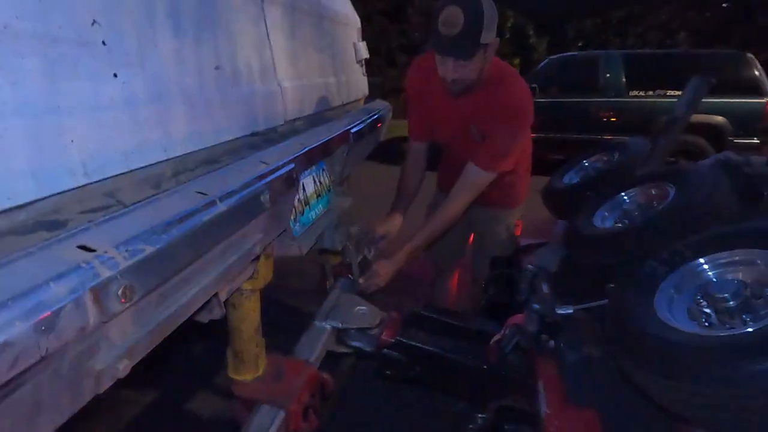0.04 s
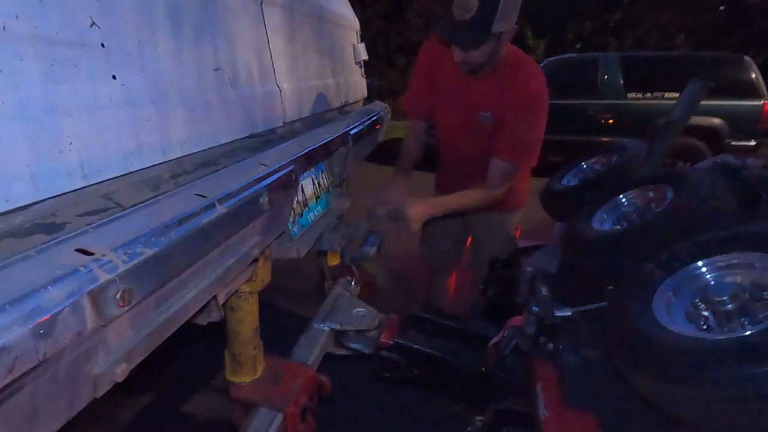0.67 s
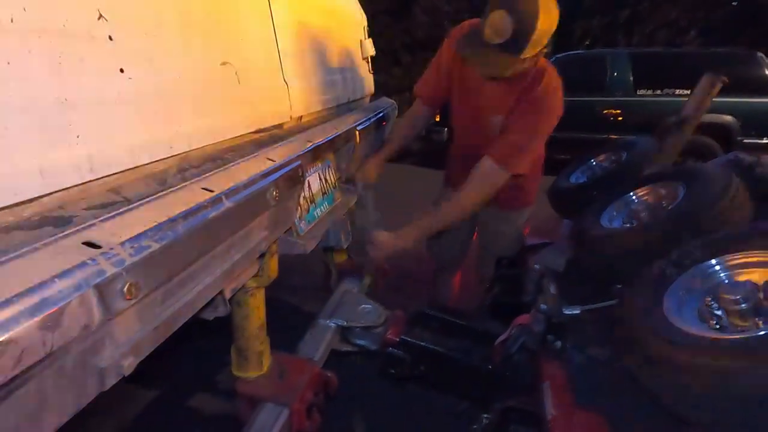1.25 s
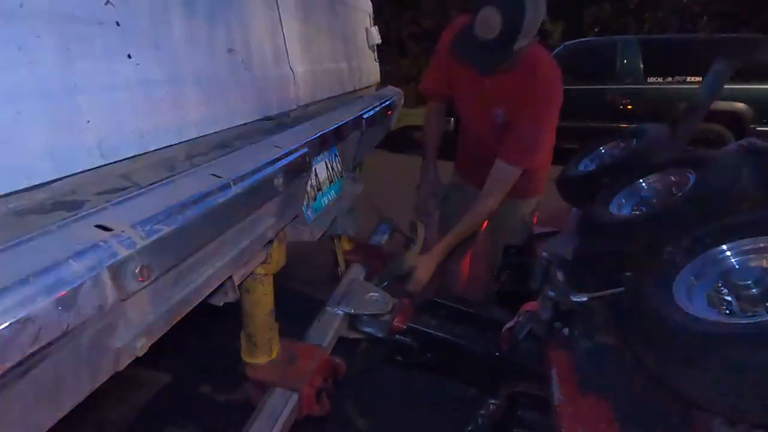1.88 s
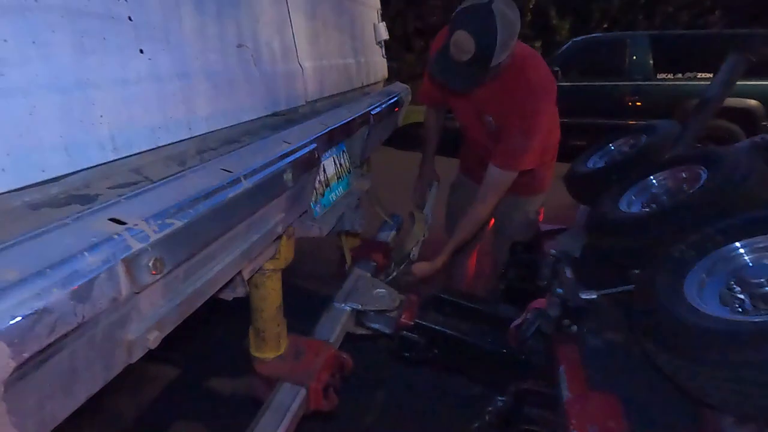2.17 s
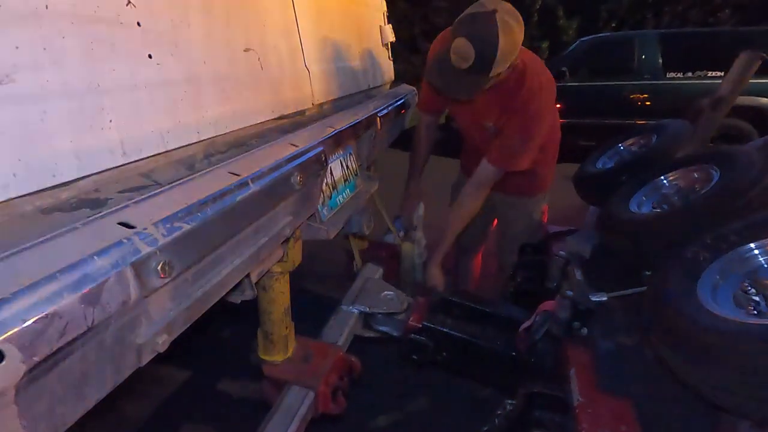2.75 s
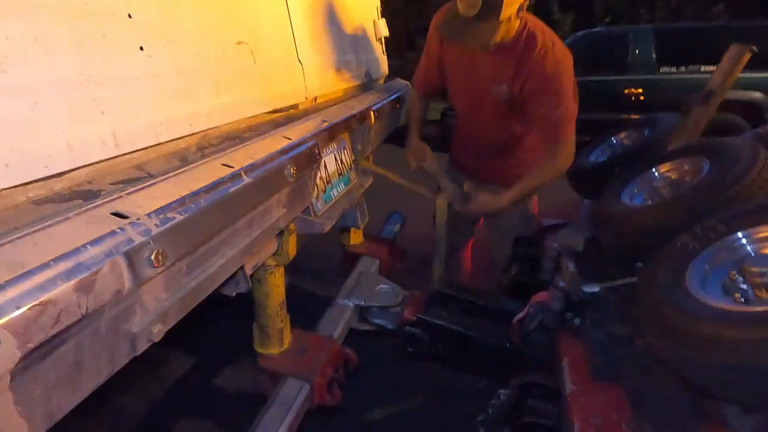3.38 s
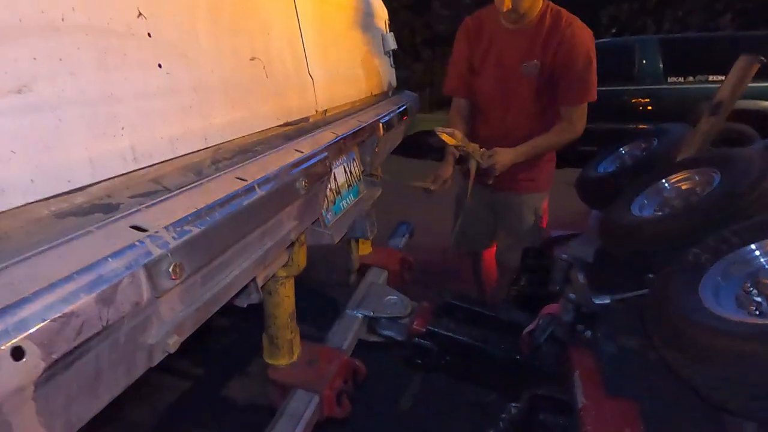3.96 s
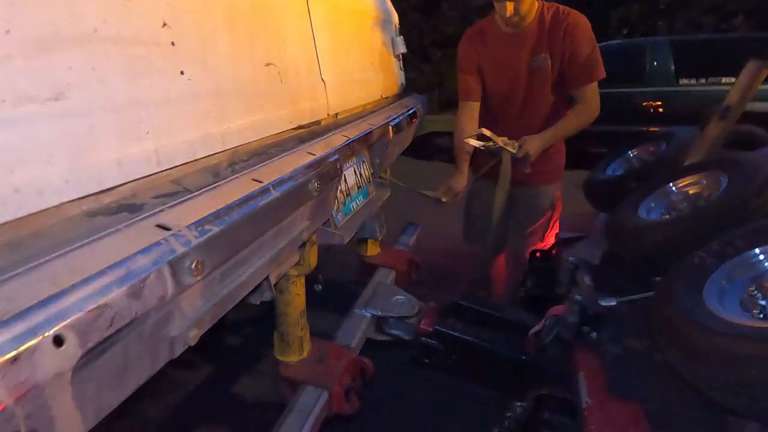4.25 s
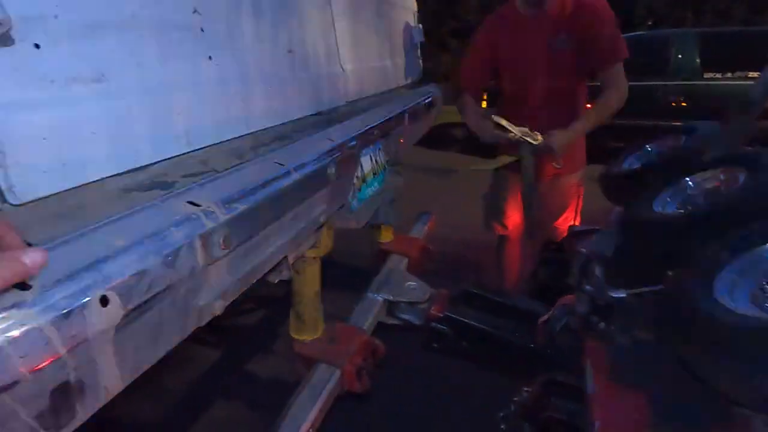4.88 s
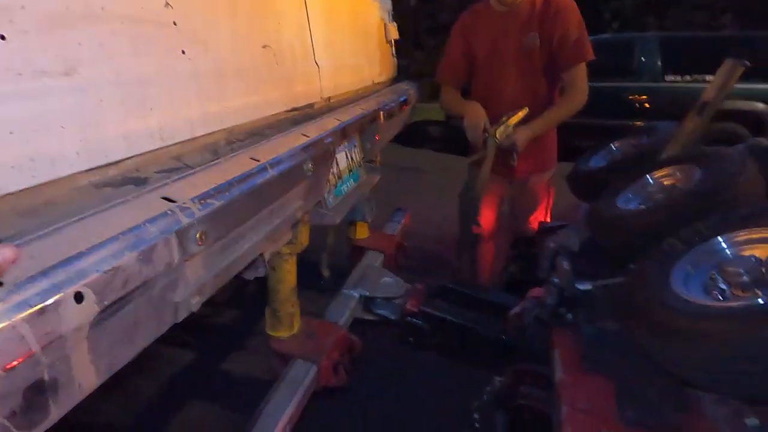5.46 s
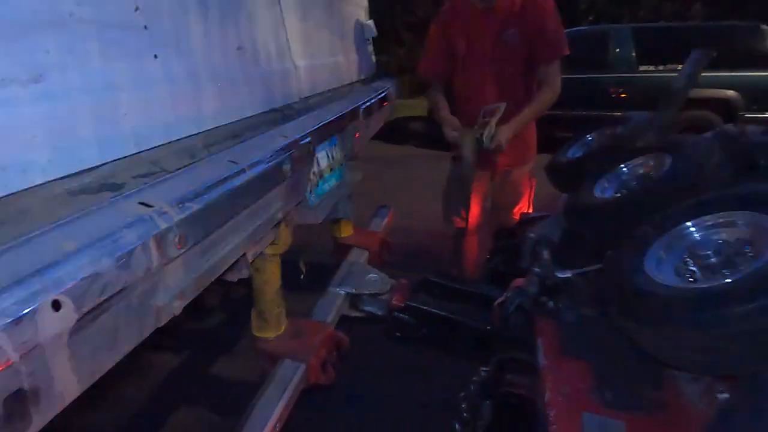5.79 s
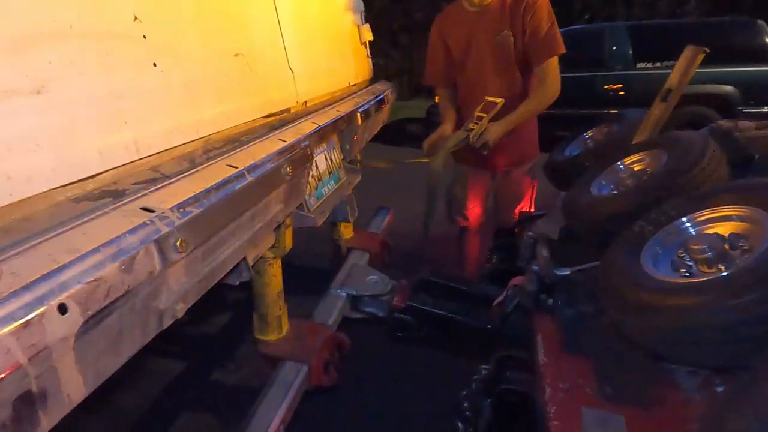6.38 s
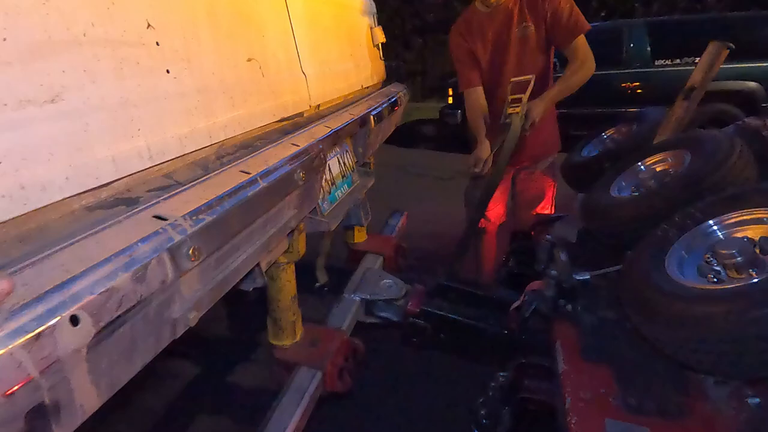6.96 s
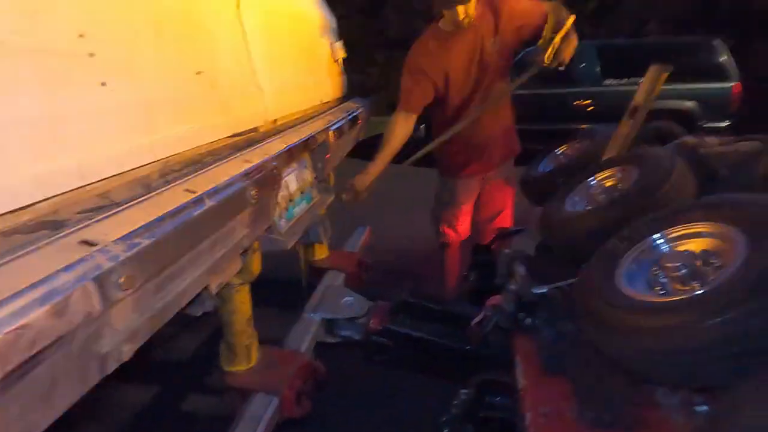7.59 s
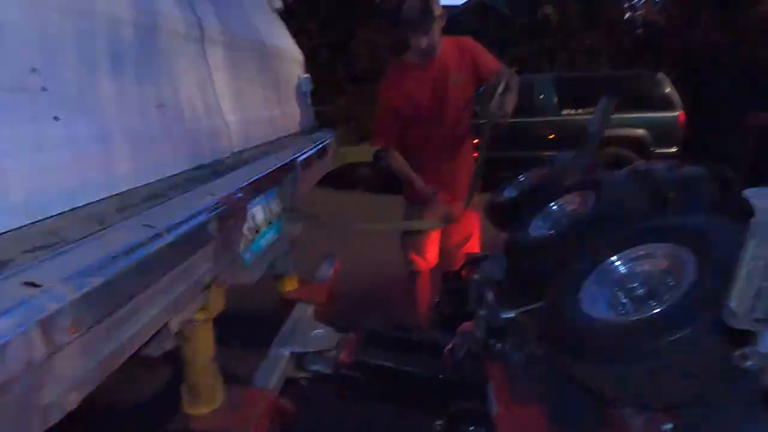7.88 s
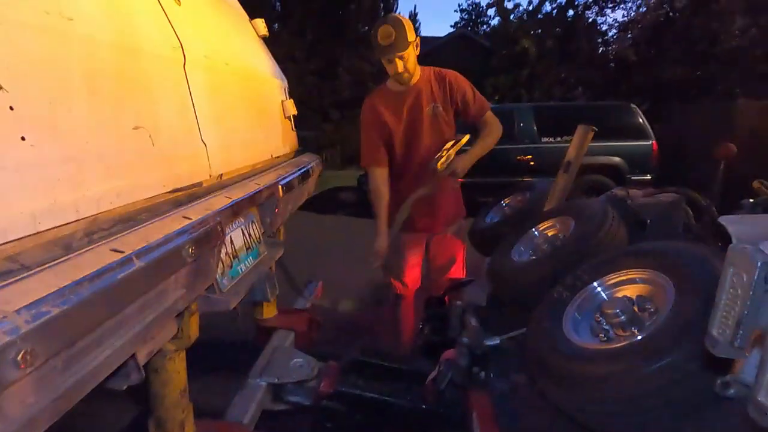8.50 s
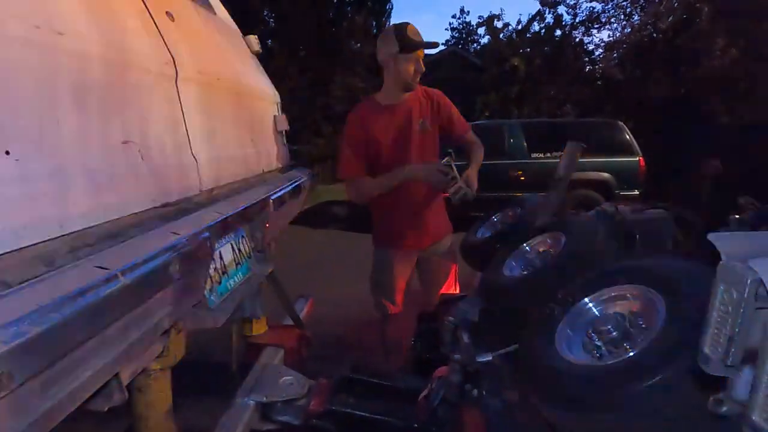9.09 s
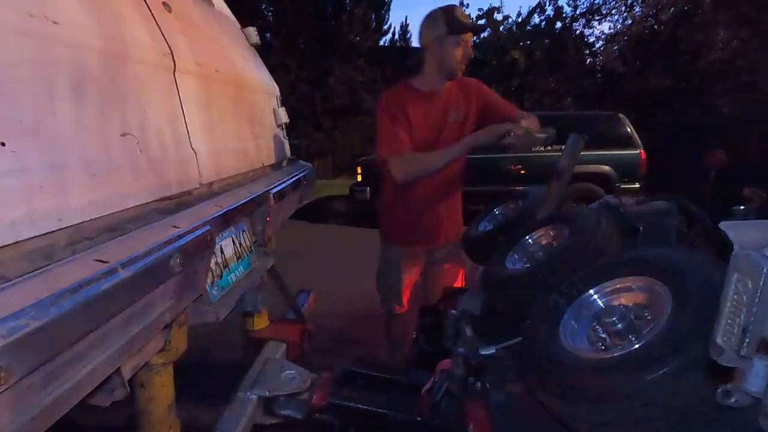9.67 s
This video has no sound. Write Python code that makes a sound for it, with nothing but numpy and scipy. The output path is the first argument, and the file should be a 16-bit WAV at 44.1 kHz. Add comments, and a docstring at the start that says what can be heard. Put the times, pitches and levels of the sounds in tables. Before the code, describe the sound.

A steel hook knocks on a truck's rear frame, then lands one heavy, ringing clank with a short clatter. A strap ratchet clinks and rattles in irregular bursts, and the hook rings briefly as it swings free. Webbing slides softly, the hook drops with a light thud, and a sharp clink comes last. The microphone is a few steps away in a quiet yard with faint traffic and a breeze.

```python
"""A yard at dusk, one microphone a few steps from the rear of a truck; distant traffic, slowly moving air.
As a far engine pulls away, a man unhooks a ratchet strap: the hook knocks and clanks on the frame.
The steel ratchet clinks and rattles in his hands, and near four seconds the hook swings free, ringing.
More clinks follow, the webbing rubs and slides, and near eight seconds a gust reaches the microphone.
The hook drops with a thud; a few light contacts and one sharp clink come last."""
import sys
import numpy as np
from scipy import signal
from scipy.fft import rfft, irfft
from scipy.io import wavfile
from scipy.ndimage import uniform_filter1d

SR = 44100
rng = np.random.default_rng(int(sys.argv[2]) if len(sys.argv) > 2 else 0)


def transcribe(u):
    """Save the signal u as a 16-bit wav file named by the first command-line argument.

    u: samples, shape (n,) or (channels, n), limited to [-1, 1]; the rate is SR.
    q: integer samples, one column per channel.
    """
    v = np.clip(np.atleast_2d(u).T, -1, 1)
    q = np.round(v * 32767).astype(np.int16)
    wavfile.write(sys.argv[1], SR, q)


N = 429534

# Spectra of far traffic, air on the microphone, sliding webbing, a thud on the truck and struck steel.
# Each row: frequency in Hz, relative level in dB.
TRAFFIC_SPECTRUM = [(24, -36), (40, 1), (108, -1), (143, -7.5), (214, -8.5), (242, -12), (298, -12.5),
                    (478, -17.5), (521, -18), (600, -20), (702, -16.5), (1540, -19), (2180, -29.5),
                    (2380, -35), (2600, -31.5), (3380, -60), (5720, -120)]
AIR_SPECTRUM = [(1, -5.5), (4, -3.5), (8, -5), (14, -19), (22, -23.5), (34, -36), (50, -51.5), (120, -86),
                (1000, -140)]
WEBBING_SPECTRUM = [(1060, -26), (1800, 2.5), (2200, -7.5), (2940, 1), (4040, -3.5), (7100, -8),
                    (13400, -17.5), (15800, -25)]
THUD_SPECTRUM = [(40, -25.5), (110, -10), (330, -8.5), (520, 2.5), (760, -7.5), (1200, -4), (1700, -2.5),
                 (2500, -26.5), (6000, -62)]
STEEL_SPECTRUM = [(530, -37.5), (900, -11), (1560, -2.5), (2130, -7.5), (2580, -5), (3250, 1), (3620, -2),
                  (4330, -0.5), (6060, -2), (7510, -3), (8570, -7), (9900, -8.5), (12900, -13),
                  (15100, -16.5), (15800, -21.5)]
# The yard's reverberation. Each row: frequency in Hz, time to fall 60 dB (t60) in seconds.
YARD_DECAY = [(150, 0.76), (600, .5), (2000, 0.25), (6000, 0.15), (15000, 0.081)]
# Modes of the truck's rear frame, the free hook (its close pair beats), the ratchet's handle and its
# side plates. Each row: frequency in Hz, relative level in dB, t60 in seconds.
FRAME_MODES = [(88, -6, .6), (167, 2, .36), (205, -10, .5), (240, -3, .2), (318, 1, .35), (346, 0, .3),
               (382, -3, .5), (400, -3, .4), (437, -3, .35), (511, -5, .36), (537, -7, .4), (646, -18, .4),
               (993, -11, .22), (1105, -8, .26), (1236, -7, .24), (1371, -10, .25), (1470, -12, .3),
               (1557, -10, .25), (1852, -9, .22)]
HOOK_MODES = [(536, -10, .26), (877, -11, .1), (950, -9, .1), (1372, -7, .26), (1557, 2, .15),
              (1663, -1, .15), (2860, -12, .13), (3192, -10, .15), (3402, -3, .16), (3831, -12, .15),
              (5119, -7.5, .65), (5130, -7.5, .65), (5346, -22, .5), (5922, -6, .26), (11050, -36, .5),
              (14950, -21, .4)]
HANDLE_MODES = [(2400, -5, .17), (2740, -4, .11), (3270, -11, .1), (3520, -14, .14), (4690, 2, .16),
                (7510, -7, .11), (9312, -5, .24), (12940, -13, .08), (13215, -12, .1)]
PLATE_MODES = [(1323, 8.5, 0.045), (1675, 12.5, 0.044), (2745, 22.5, 0.03), (2920, 21, 0.028),
               (5230, 24, 0.029), (5730, 23, 0.029), (7430, 21.5, 0.037)]  # the grip scales these decay times
# The breeze swells. Each row: peak time in seconds, level in dB, half length in seconds.
GUSTS = [(0.05, -30, 0.23), (7.92, -20, 0.089)]
# A far engine pulls away. Each row: time in seconds, pitch in Hz, level in dB.
ENGINE_COURSE = [(0, 89.54, -52), (1.3, 96.7, -57), (2.102, 106.8, -57.5), (2.7, 115.9, -61.5),
                 (3.6, 118, -64.5)]
# Strap runs through the hands.
# Each row: peak time in seconds, relative level in dB, half length in seconds.
PULLS = [(0, -49.5, 0.081), (.55, -56.5, 0.18), (1.27, -66.5, .08), (1.65, -63.5, 0.5),
         (2.34, -70.5, 0.047), (2.72, -58, 0.13), (3.52, -57, 0.23), (4.25, -52.5, 0.26), (5.25, -61, .12),
         (5.98, -61.5, 0.25), (6.4, -62, 0.043), (6.83, -66, 0.064), (7.3, -54.5, 0.39), (8.52, -68, 0.16),
         (9.14, -63, 0.084), (9.7, -58, 0.2)]
# Strap and hook drag over metal and cloth, and near 4.5 s a hand brushes the truck; the brief low row near 8.6
# s is the dropped hook's thud. # Each row: peak time in seconds, level in dB, half length in seconds, centre
# frequency in Hz.
RUBS_AND_DROP = [(1.506, -37, 0.011, 1600), (1.6, -44, .09, 1150), (3.787, -53.5, .04, 700),
                 (4.522, -42, .041, 430), (4.574, -35, .038, 304), (4.705, -53, 0.1, 340),
                 (7.403, -47, 0.037, 506), (8.545, -47.5, 0.031, 585), (8.617, -37.5, 0.008, 330),
                 (9.387, -52.5, .021, 540)]
# Steel slips on steel. Each row: peak time in seconds, pitch in Hz, level in dB, width in seconds.
SQUEAKS = [(1.459, 4760, -26.5, 0.0096), (1.601, 5160, -39.5, 0.0052), (4.247, 7622, -49, 0.0092),
           (4.292, 7720, -29, 0.0031), (8.633, 7030, -44, 0.0049)]
# Loose parts rattle as the ratchet turns over. Each row: start in seconds, length in seconds, level in dB.
JIGGLES = [(2.549, .09, -48.5), (3.383, .09, -53), (4.653, .14, -50.5), (5.18, .09, -52), (9.51, .23, -43)]
# The ratchet's parts meet. Each row: start in seconds, level in dB, relative ring of the handle in dB.
CLINKS = [(2.658, -36.5, -51), (2.664, -39, -54), (2.67, -33, -58), (2.773, -29.5, -60), (2.939, -31, -66),
          (2.961, -27, -38), (3.05, -40, -47.5), (3.083, -27, -43.5), (3.285, -47, -44.5),
          (3.398, -43, -68), (3.448, -40, -45.5), (3.531, -52, -60), (3.626, -38, -50.5), (3.673, -41, -54),
          (3.694, -43, -44), (4.247, -28.5, -64), (4.253, -23, -68), (4.261, -26, -61), (4.291, -30.5, -69),
          (4.795, -38.5, -73), (5.117, -33.5, -77), (5.325, -42.5, -63), (5.346, -31.5, -64),
          (5.352, -27.5, -58), (5.412, -31, -70), (5.418, -34, -53), (5.461, -30, -38.5), (5.785, -56, -67),
          (6.073, -35.5, -46), (7.845, -47, -48.5), (7.95, -66, -63), (8.024, -47, -53), (8.271, -49, -68),
          (8.902, -44.5, -67), (9.363, -35.5, -66), (9.441, -37, -65), (9.48, -38, -53), (9.566, -37, -68),
          (9.584, -18.5, -65), (9.698, -40.5, -64)]
# The hook strikes the truck or the ground. Each row: start in seconds, level in dB,
# brightness in dB per octave, relative thud level in dB, ring of the frame in dB.
KNOCKS = [(0.284, -41.5, -5, -51, -53), (0.302, -43, -2, -46, -45), (0.347, -29, 0, -30, -40),
          (0.628, -46, -15, -43, -53), (0.658, -28.5, 0, -37, -43), (0.779, -55, -6, -55, -67),
          (0.818, -43, -12.5, -38.5, -43), (0.893, -49, -11.5, -51, -48.5), (1.061, -61, -6, -66, -54),
          (1.303, -30.5, -8, -25, -49), (1.31, -12.5, 2.5, -15.5, -42.5), (1.316, -12.5, 9, -18, -27),
          (1.364, -31.5, -2, -21.5, -47), (1.377, -21.5, -2.5, -28.5, -39.5), (1.399, -29.5, 4, -36, -38.5),
          (1.434, -37.5, -11.5, -35, -55.5), (1.482, -30.5, 1, -51, -62.5), (1.504, -40.5, -37, -27, -41),
          (1.634, -25, -1.5, -39, -49), (1.647, -29.5, 2, -32, -47.5), (1.718, -34, -2.5, -34.5, -44),
          (2.095, -60, -16, -55, -55.5), (3.892, -29, -7, -31, -57), (3.897, -19, -10, -31, -39.5),
          (8.59, -35, -10.5, -48, -59.5), (8.614, -31.5, -6.5, -30, -62), (9.1, -47, -8.5, -36.5, -68.5)]

CLINK_DB, CLINK_RING_DB, CLINK_T60_S = -34, -55.5, 0.03  # an ordinary clink: level, handle ring, decay


def amp(db):
    """Decibels to gain."""
    return 10 ** (np.asarray(db) / 20)


def unit_rms(x):
    """Scales to rms 1."""
    return x / np.sqrt(np.mean(x ** 2) + 1e-20)


def curve_at(points, hz):
    """Reads a curve on a log-frequency axis."""
    point_hz, value = np.transpose(points)
    return np.interp(np.log(hz + 1), np.log(point_hz + 1), value)


def add(mix, start_s, sound):
    """Mixes a sound in at the given time."""
    part = mix[max(round(start_s * SR), 0):][:len(sound)]
    part += sound[:len(part)]


def noise(spectrum, size=N):
    """Noise of rms 1, shaped by (Hz, dB) points."""
    hz = np.fft.rfftfreq(size, 1 / SR)
    return unit_rms(irfft(rfft(rng.standard_normal(size)) * amp(curve_at(spectrum, hz)), size))


def swells(rows):
    """A gain for every sample: each motion gathers speed and slows again."""
    t = np.arange(N) / SR
    return sum(amp(db) / np.cosh(np.clip((t - s) / half * 1.3, -50, 50)) for s, db, half in rows)


def ring(modes, spread_db, size=28000, scatter=0):
    """Dying sines; where the blow lands varies their strengths, and a messy contact scatters the phases."""
    t = np.arange(size) / SR
    hz, db, t60 = np.transpose(modes)[:, :, None]
    cycles = hz * t + scatter * rng.random(hz.shape)
    strength = amp(db + spread_db * rng.standard_normal(hz.shape))
    return (strength * amp(-60 * t / t60) * np.sin(2 * np.pi * cycles)).sum(0)


def traffic_and_breeze(traffic_db=-51, breeze_db=-27):
    """Traffic dulled by distance, and the breeze at the microphone, whose eddies grow with its square."""
    breeze = amp(breeze_db) + swells(GUSTS)
    eddies = noise([(8, -22.5), (25, 10), (40, -3.5), (60, -15.5), (150, -46.5), (1000, -100)])
    air = breeze * noise(AIR_SPECTRUM) + breeze ** 2 * eddies
    return amp(traffic_db) * noise(TRAFFIC_SPECTRUM) + air


def far_engine(octave_db=-5, waver=0.017):
    """Two wavering low orders of a distant exhaust climb and fade, then hold faintly."""
    s, hz, db = np.transpose(ENGINE_COURSE)
    t = np.arange(N) / SR
    pitch = np.interp(t, s, hz) * (1 + waver * noise([(1, -1.5), (15, -3), (60, -62.5)]))
    phase = 2 * np.pi * np.cumsum(pitch) / SR
    return amp(np.interp(t, s, db)) * (np.sin(phase) + amp(octave_db) * np.sin(2 * phase))


def yard_echoes(x, early_db=-13, tail_db=-15, early_s=.03, count=12):
    """Echoes off the ground and the vehicles reach the microphone, then a faint diffuse tail."""
    early = np.zeros(SR)
    reflections = rng.choice([-1., 1.], count) * rng.uniform(0.83, 1, count)
    early[(rng.uniform(.1, 1, count) * early_s * SR).astype(int)] = reflections
    hz, t, bands = signal.stft(rng.standard_normal(SR), SR, nperseg=256)
    envelope = amp(-60 * t / curve_at(YARD_DECAY, hz)[:, None]) * (1 - np.exp(-t / 0.0027))
    tail = signal.istft(bands * envelope, SR, nperseg=256)[1][:SR]
    response = amp(early_db) * early / np.linalg.norm(early) + amp(tail_db) * tail / np.linalg.norm(tail)
    return signal.fftconvolve(x, response)[:N]


def strap_and_drop(slide_db=-1, grain_db=2, grain_hz=120):
    """Webbing hisses in strokes and grains; strap and a hand swish dully on the truck; the dropped hook thuds
    once."""
    grains_db = grain_db * noise([(1, 0), (grain_hz, -6), (4 * grain_hz, -40)])
    strokes_db = noise([(2, -9.5), (8, -0.5), (20, -10), (80, -80)])
    hiss = unit_rms(noise(WEBBING_SPECTRUM) * amp(grains_db + strokes_db))
    out = amp(slide_db) * swells(PULLS) * hiss
    t = np.arange(-16384, 16384) / SR
    for s, db, half, hz in RUBS_AND_DROP:
        band = noise([(hz / 5, -30), (hz * .5, -13), (hz * .83, -1), (hz, 0), (hz * 1.8, -11),
                      (hz * 4, -19), (hz * 20, -46), (SR, -70)], len(t))
        add(out, s + t[0], amp(db) * band / np.cosh(t / half * 1.3))
    return out


def squeaks(jitter=0.025, octave_db=-15):
    """Steel sticks and slips on steel in brief, unsteady whistles."""
    out, t = np.zeros(N), np.arange(-2048, 2048) / SR
    for s, hz, db, width in SQUEAKS:
        wobble = unit_rms(uniform_filter1d(rng.standard_normal(len(t)), 30))
        phase = 2 * np.pi * np.cumsum(hz * (1 + jitter * wobble)) / SR
        whistle = np.sqrt(2) * (np.sin(phase) + amp(octave_db) * np.sin(2 * phase))
        add(out, s + t[0], amp(db) * whistle / np.cosh(2 * t / width))
    return out


def steel_modes(count=36):
    """Overtones of stamped steel, the higher dying sooner. Each row: Hz, level in dB, t60 in seconds."""
    hz = 2300 * 6 ** ((np.arange(count) + rng.random(count)) / count)
    t60 = rng.uniform(.025, .05, count) * (4000 / hz) ** .5
    return np.transpose([hz, curve_at(STEEL_SPECTRUM, hz) + 5 * np.log10(hz), t60])


def steel_contact(modes, db, tilt_db, t60, rise_s=0.002, chatter=0.64, rebounds_per_s=450, size=8192):
    """A blow with tiny rebounds cracks, and wakes a different few overtones each time."""
    hz, t = np.fft.rfftfreq(size, 1 / SR), np.arange(size) / SR
    tilt = lambda f: tilt_db * np.log2(np.clip(f, 2200, 15000) / 5000)
    rebounds = (rng.random(size) < rebounds_per_s / SR) * rng.exponential(1, size)
    kicks = signal.lfilter([1], [1, -np.exp(-1 / (.0008 * SR))], rebounds)
    crack = noise(np.transpose([hz, curve_at(STEEL_SPECTRUM, hz) + tilt(hz)]), size)
    crack *= amp(-60 * t / t60) * (1 - chatter + kicks * chatter)
    mode_hz, mode_db, mode_t60 = modes.T
    grip = np.sqrt(t60 / 0.022)  # a tight grip damps the overtones too
    held_modes = np.transpose([mode_hz, mode_db + tilt(mode_hz), mode_t60 * grip])
    tones = ring(held_modes, spread_db=5, size=size, scatter=0.85)
    attack = round(.006 * SR)  # the first 6 ms set the level
    blow = crack / np.std(crack[:attack]) + amp(-3) * tones / np.std(tones[:attack])
    blow *= 1 - np.exp(-t / rise_s)
    return amp(db) * blow / np.std(blow[:attack])


def clink_tilt(db, slack_db=0):
    """Brightness in dB per octave: a harder contact is brighter, a loosely held one duller."""
    return min(-0.47 + 0.13 * (db - CLINK_DB) - 0.18 * slack_db, 4.5)


def ratchet(handle_db=1, handle_tilt_share=0.16, tick_gap_s=.06, tick_jitter_s=0.013, tick_t60=0.026):
    """Parts clink; a loosely held handle rings on, darker after a soft touch. Loose parts tick between."""
    out, overtones = np.zeros(N), np.vstack([steel_modes(), PLATE_MODES])
    for s, db, ring_db in CLINKS:
        slack_db = (ring_db - CLINK_RING_DB) - (db - CLINK_DB)  # how much more the handle rings than usual
        tilt_db = clink_tilt(db, slack_db)
        t60 = CLINK_T60_S * 2 ** (slack_db / 41)  # the freer the handle, the longer the contact
        handle = [(hz, mode_db + handle_tilt_share * tilt_db * np.log2(hz / 5000), decay)
                  for hz, mode_db, decay in HANDLE_MODES]
        add(out, s, steel_contact(overtones, db, tilt_db, t60))
        add(out, s, amp(ring_db + handle_db) * ring(handle, spread_db=-0.5, size=14000))
    for start, length, db in JIGGLES:
        for s in np.arange(start, start + length, tick_gap_s):
            tick_db = db + 0.5 * rng.standard_normal()
            tick_s = s + tick_jitter_s * rng.uniform(-1, 1)
            add(out, tick_s, steel_contact(overtones, tick_db, clink_tilt(tick_db), tick_t60))
    return out


def hook_knocks(thud_db=-2, thud_t60=.085, thud_rise_s=0.0015, panel_rise_s=0.0026):
    """The hook hits the frame: steel contact, a thud, and panel modes; heavier blows shake lower ones."""
    out, overtones, t = np.zeros(N), steel_modes(), np.arange(28000) / SR
    for s, db, tilt_db, low_db, ring_db in KNOCKS:
        t60 = min(0.023 * 2 ** (-min(tilt_db, 0) / 7.5), 0.13)  # a dull, glancing blow lasts longer
        lowest_hz = np.interp(ring_db, [-42, -36, -32], [540, 300, 80])
        modes = [(hz, mode_db - 10 * np.log10(1 + (lowest_hz / hz) ** 10), decay)
                 for hz, mode_db, decay in FRAME_MODES]
        thud = noise(THUD_SPECTRUM, len(t)) * (1 - np.exp(-t / thud_rise_s)) * amp(-60 * t / thud_t60)
        panels = ring(modes, spread_db=0, size=len(t), scatter=1)
        panels *= 1 - np.exp(-t / panel_rise_s)  # the shake takes time to spread
        add(out, s, steel_contact(overtones, db, tilt_db, t60))
        add(out, s, amp(low_db + thud_db) * thud + amp(ring_db) * panels)
    return out


def free_hook(start_s=3.897, level_db=-23):
    """The hook swings clear of the frame and rings in its own modes."""
    out = np.zeros(N)
    add(out, start_s, amp(level_db) * ring(HOOK_MODES, spread_db=1.5))
    return out


def scene():
    """In mono: steel and its echoes and the strap a few steps away, the evening background beyond."""
    metal = ratchet() + hook_knocks() + free_hook() + squeaks()
    return (metal + yard_echoes(metal) + strap_and_drop() + traffic_and_breeze() + far_engine())[None]


def record(dry):
    """The microphone's own hiss, the hardest peaks rounded softly, and a band limit."""
    hiss = amp(-73) * noise([(500, 0), (3000, 0), (8000, -8), (16000, -14)])
    rounded = .95 * np.tanh((dry + hiss) / .95)
    lowpass = signal.firwin(301, 15900, window=("kaiser", 8), fs=SR)
    return signal.oaconvolve(rounded, lowpass[None], "same")


dry = scene()
out = record(dry)
transcribe(out)
```